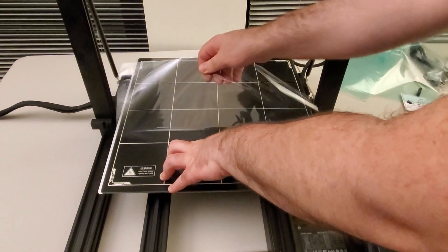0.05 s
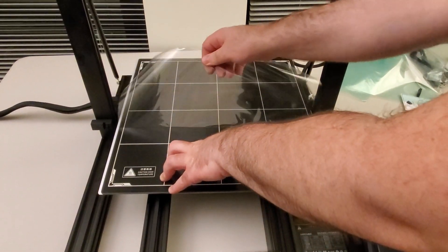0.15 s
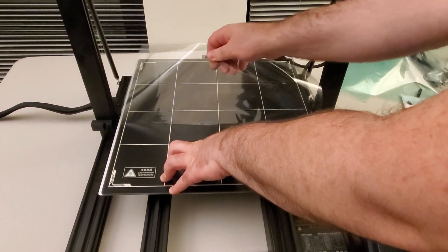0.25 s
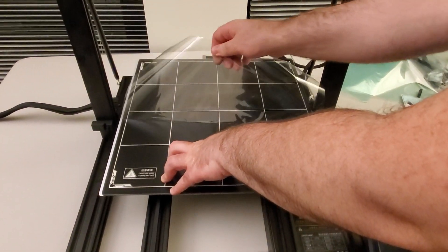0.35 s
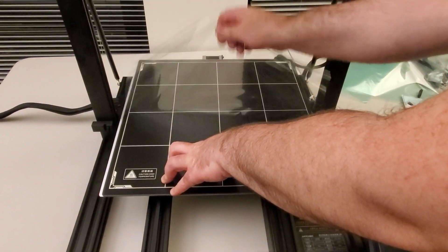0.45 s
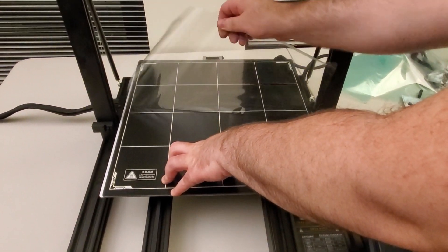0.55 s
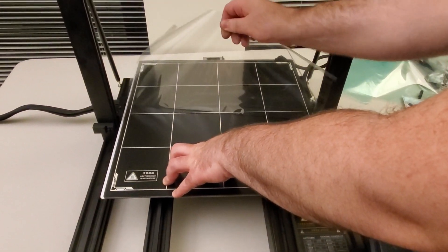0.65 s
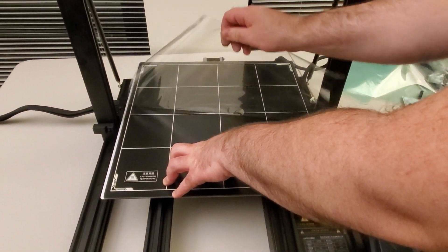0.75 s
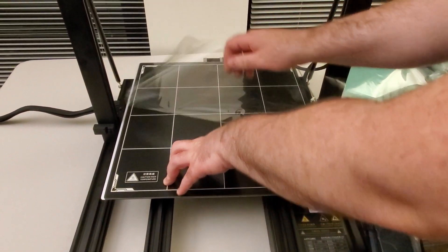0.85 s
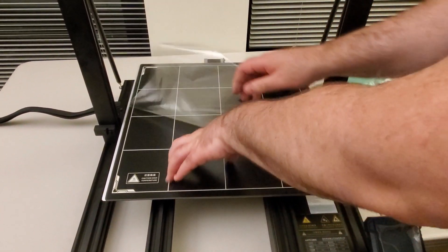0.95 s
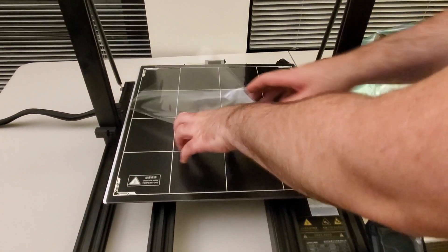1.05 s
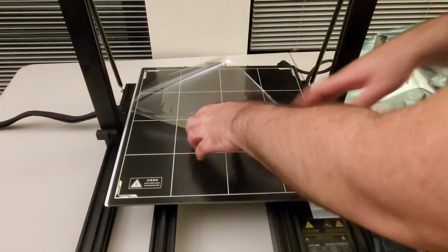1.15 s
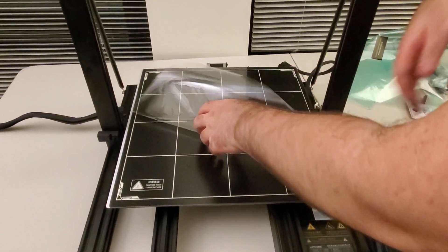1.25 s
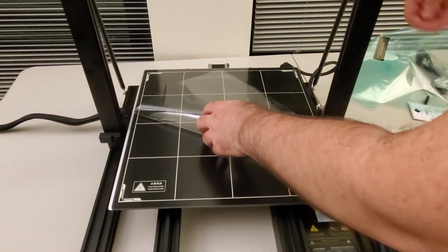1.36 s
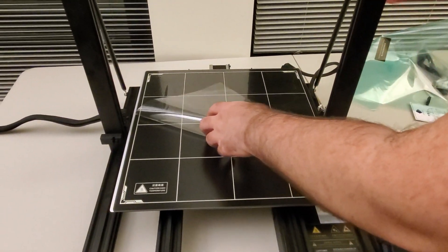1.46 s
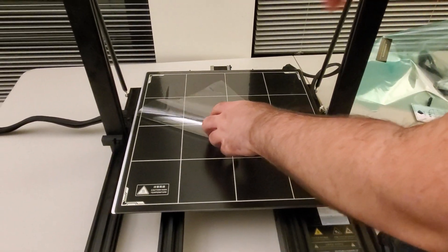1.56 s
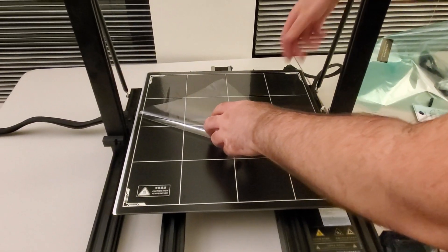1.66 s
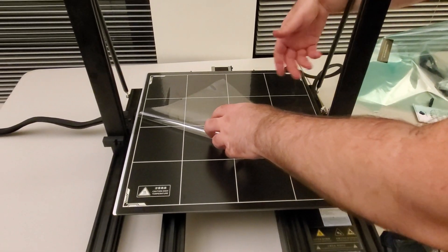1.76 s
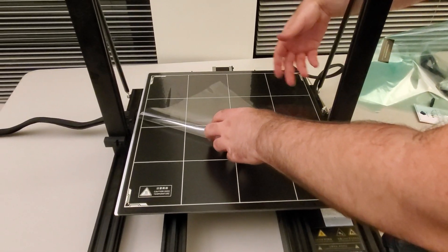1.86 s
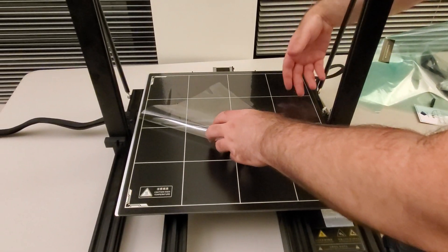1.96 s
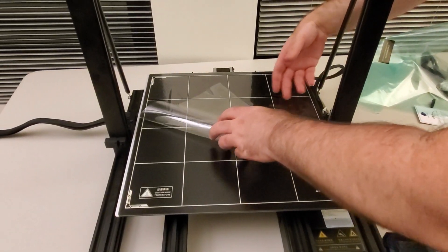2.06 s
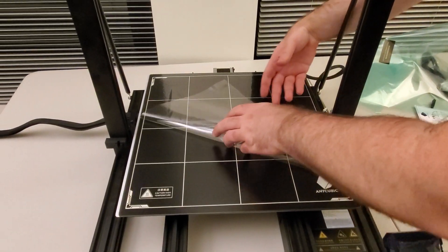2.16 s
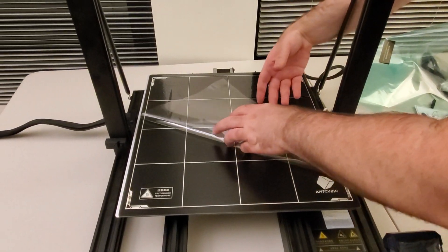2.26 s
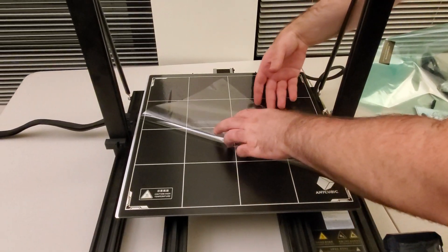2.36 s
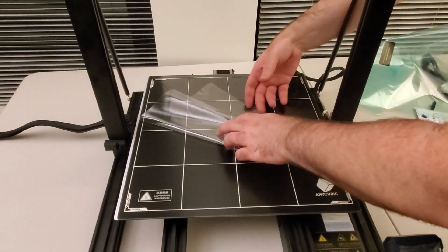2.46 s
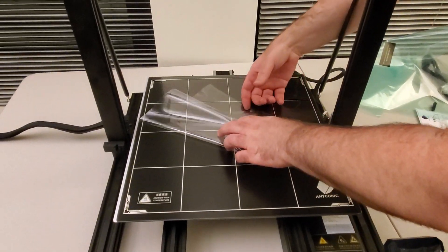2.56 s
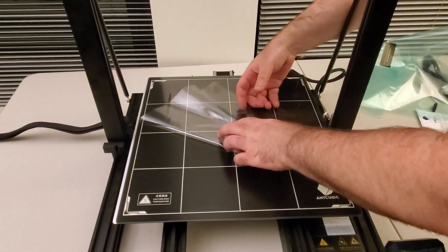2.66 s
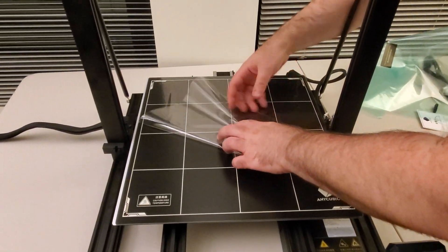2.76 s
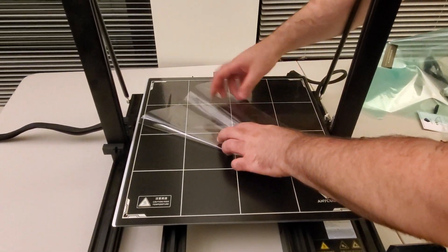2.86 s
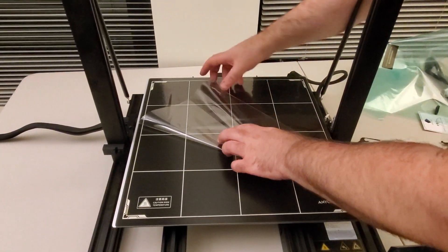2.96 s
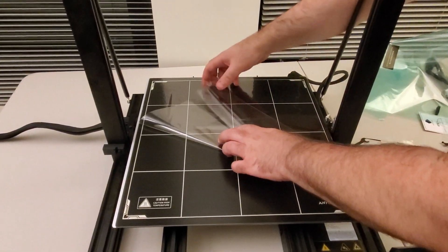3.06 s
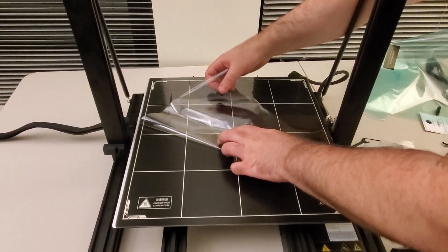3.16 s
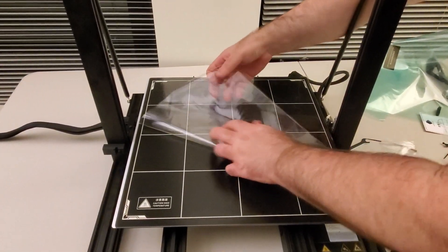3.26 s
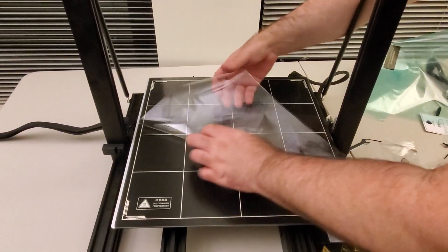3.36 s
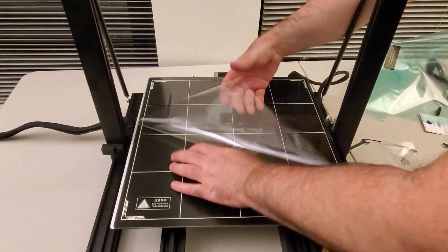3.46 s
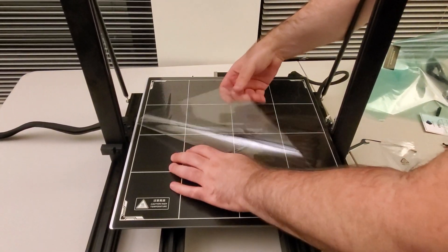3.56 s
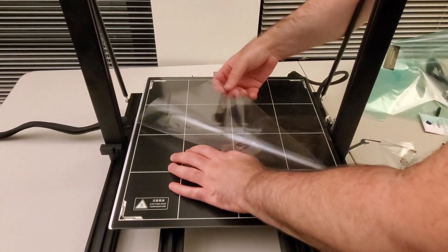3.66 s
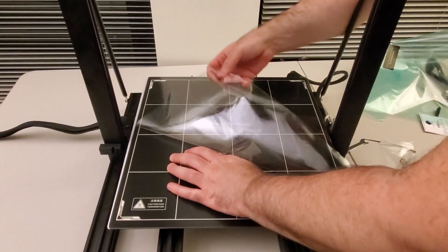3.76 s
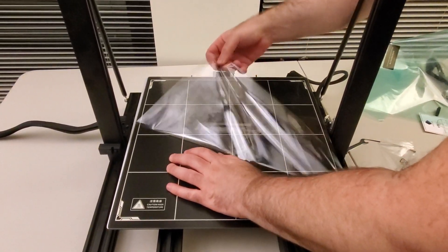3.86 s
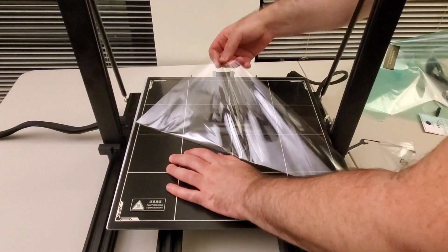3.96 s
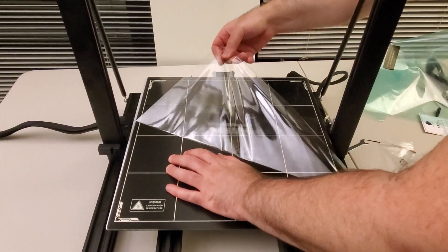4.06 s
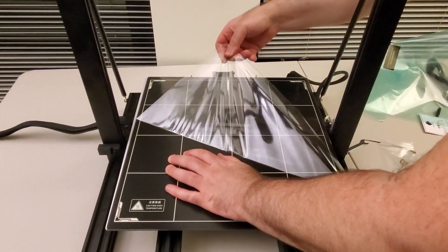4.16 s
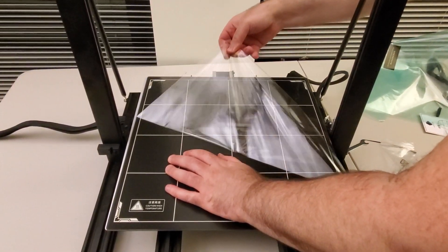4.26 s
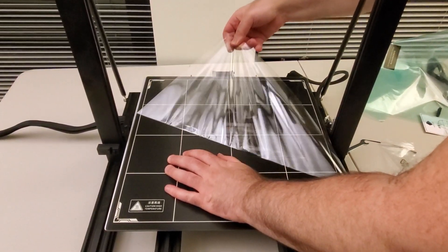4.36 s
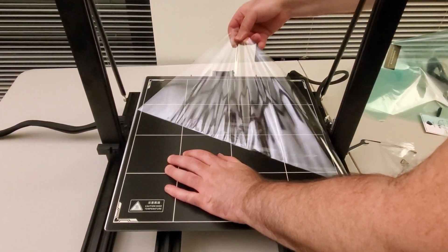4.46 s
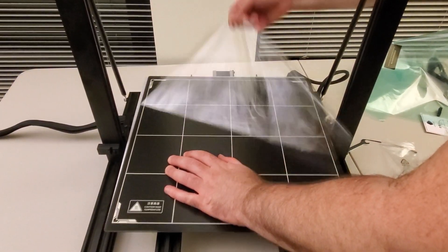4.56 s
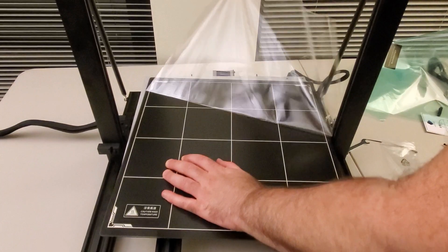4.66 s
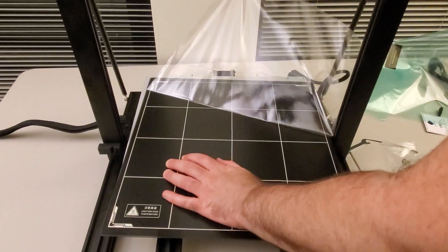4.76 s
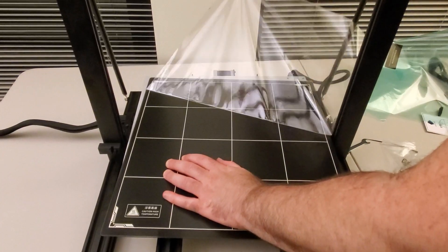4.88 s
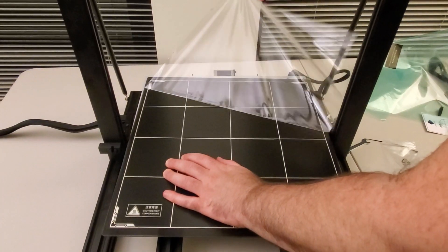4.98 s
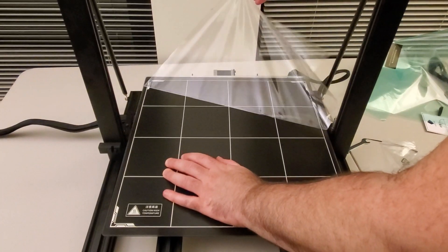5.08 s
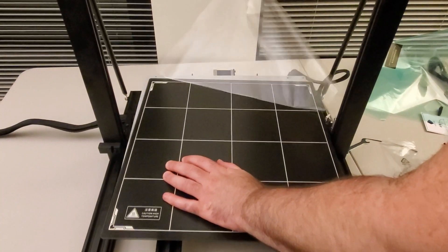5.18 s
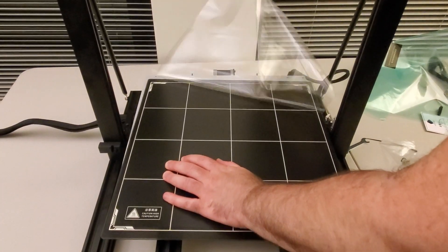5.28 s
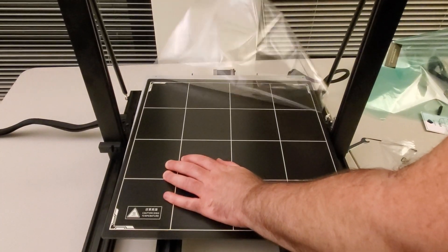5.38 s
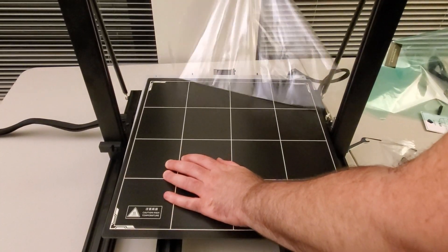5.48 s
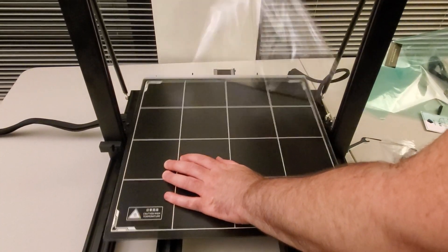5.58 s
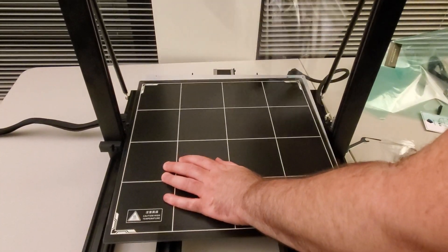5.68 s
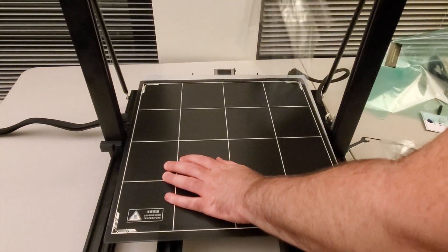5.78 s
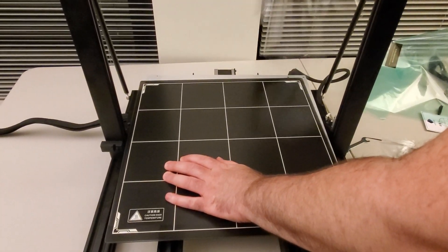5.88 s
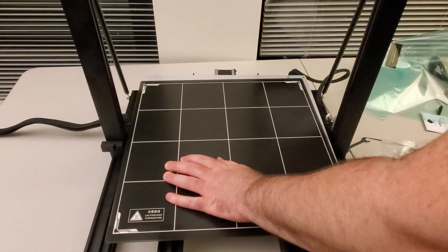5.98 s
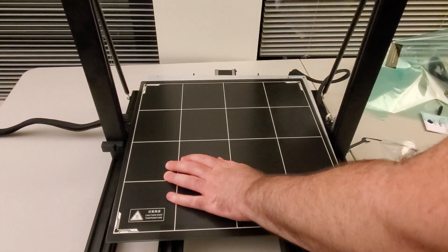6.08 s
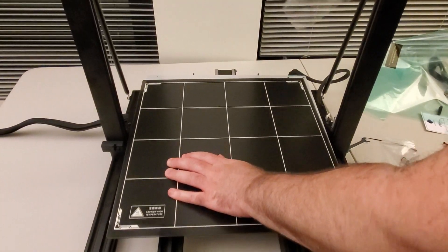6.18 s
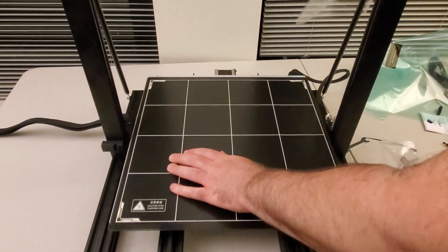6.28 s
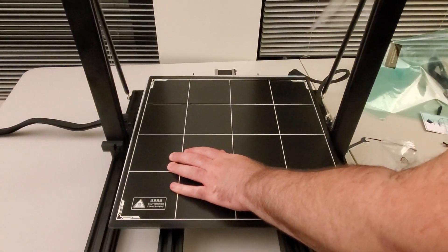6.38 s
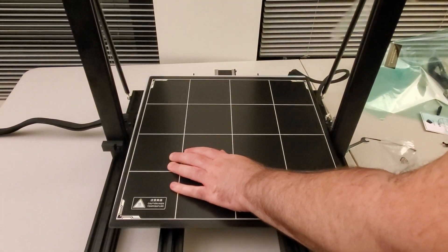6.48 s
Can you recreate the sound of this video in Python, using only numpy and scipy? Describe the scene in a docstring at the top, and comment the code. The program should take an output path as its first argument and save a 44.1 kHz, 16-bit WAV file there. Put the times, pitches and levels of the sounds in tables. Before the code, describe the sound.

Hands rub a plate and rip adhesive film loose; the sheet rustles and snaps, then pops free in bursts over a faint fan.

```python
"""A hand rubs dully on a flat plate, a thump and a short rip follow at once, over a faint fan.
Protective film is peeled by hand off the plate in a small live room, close to two microphones.
Glue lets go in rips (dense random slips) and single ticks (dispersed cracks); the loose sheet
rustles (clumped clicks through a resonance), snaps at its creases and thumps when it jerks.
Fingertips tap the plate (short noise bursts). The fan is coloured noise plus wavering tones."""
import sys
import numpy as np
from scipy import signal
from scipy.fft import rfft, irfft, next_fast_len
from scipy.io import wavfile
from scipy.ndimage import uniform_filter1d, minimum_filter1d

SR = 44100
rng = np.random.default_rng(int(sys.argv[2]) if len(sys.argv) > 2 else 0)


def bounce(signal):
    """Save signal as a 16-bit WAV file at the path given by the first command-line argument."""
    frames = np.transpose(np.atleast_2d(signal))
    limited = np.clip(frames, -1, 1)
    pcm = np.round(limited * 32767).astype(np.int16)
    wavfile.write(sys.argv[1], SR, pcm)


N = 288007
TIME = np.arange(N) / SR

# All levels are relative, ahead of the mix gains; colours are relative spectral densities.
# fan wash: [f/Hz, density/dB]
AIR_COLOUR = [(30, -15), (140, -12.5), (300, -4), (500, -3), (740, -20), (1200, -5.5), (2600, -9),
              (5000, -24), (8000, -33.5), (16000, -41.5)]
AIR_DB = -56
# fan tones: [f/Hz, level/dB]
FAN_TONES = [(145.3, -67), (398.4, -59), (513, -57.5)]
# swell and fade of the fan tones: [t/s, gain/dB]
HUM_SWELL = [(1.2, -11.5), (2.2, -2), (3.3, 3.5), (5, -13.5), (6.5, -8.5)]
# hand rubs and presses on the plate: [start t/s, length/s, level/dB]
RUBS = [(0, 0.23, -38), (0.206, 0.67, -50.5), (0.964, 0.39, -50.5), (2.28, 1.6, -48.5), (3.558, 0.26, -42),
        (3.885, 0.14, -44.5), (4.25, 0.23, -40.5), (5.692, 0.21, -46)]
# friction colour: [f/Hz, density/dB]
RUB_COLOUR = [(20, -35), (40, -6), (60, 1), (100, -10), (140, 2.5), (250, -8.5), (500, -2), (1000, -3),
              (1600, -3), (4000, -59)]
RUB_ATTACK_S, RUB_RISE_DB, RUB_RELEASE_S = 0.01, 4, 0.075
# sheet jerks and pushes on the plate: [t/s, level/dB, flap f/Hz, decay/s]
THUMPS = [(0.003, -36.5, 65.4, 0.037), (0.174, -24.5, 91.4, 0.015), (0.525, -15, 59, 0.0085),
          (3.564, -42, 63.3, 0.03)]
# plate ringing under a thump: [f/Hz, level re thump/dB, decay/s]
PLATE_MODES = [(181, -18, 0.018), (286.3, -21, 0.044)]
# runs of tiny glue slips: [t/s, length/s, level/dB, swell over the run/dB, plate share/dB]
RIPS = [(0.006, 0.027, -18, -9.5, -16), (0.174, 0.017, -14, -12, -10.5), (0.508, 0.048, -15.5, 2.5, -10.5),
        (3.923, 0.024, -21, 8, -20), (4.367, 0.011, -18, -7, -18), (4.6, 0.0071, -23.5, -14, -12),
        (4.638, 0.102, -18, 0, -19.5), (5.1954, 0.064, -15, -5, -14), (5.49, 0.047, -24.5, 1, -11.5),
        (5.6498, 0.08, -18, -7, -11.5), (5.962, 0.027, -23.5, -8, -15.5)]
# slips heard from the film: [f/Hz, density/dB]
RIP_COLOUR = [(35, -57), (60, -42), (281, -20.5), (458, -4.5), (715, -6.5), (924, -4.5), (1660, -3),
              (2970, 1), (5210, -7), (6900, -8), (7570, -14.5), (11300, -10), (16000, -13.5)]
# the plate's answer to the slips: [f/Hz, density/dB]
PLATE_COLOUR = [(30, -15), (90, -19), (160, -3), (260, -11), (430, -0.5), (800, 0), (1600, -23.5),
                (4000, -74.5)]
# single glue spots pop under the taut film: [t/s, level/dB]
TICKS = [(0.8708, -20), (3.9584, -2.5), (4.185, -9), (4.1939, -7.5), (4.2744, -12.5), (4.355, -8),
         (4.4022, -11), (4.438, -11.5), (4.4495, -3.5), (4.5046, -2.5), (4.5159, -8.5), (4.5491, -10.5),
         (4.568, -4.5), (4.5774, -6), (4.6266, -7), (5.1022, -23.5), (5.136, -21.5), (5.1574, -19.5),
         (6.1961, -18.5), (6.2477, -22.5)]
# hand moves the loose sheet, which rings higher when taut: [start t/s, length/s, level/dB, ring f/Hz]
FLEXES = [(0.88, 0.038, -26.5, 2600), (0.919, 0.072, -34.5, 2640), (0.999, 0.08, -29, 3340),
          (1.08, 0.11, -31, 2900), (1.196, .19, -36.5, 2690), (1.403, 0.076, -43.5, 2310),
          (1.611, 0.029, -44.5, 1370), (1.614, 0.016, -59, 3175), (2.292, 0.12, -41.5, 1630),
          (2.453, 0.1, -31, 1890), (2.612, 0.062, -31, 2480), (2.745, 0.15, -28.5, 2460),
          (2.892, 0.064, -35, 2250), (2.992, 0.04, -36, 2240), (3.167, 0.087, -30, 2220),
          (3.313, 0.052, -20.5, 2640), (3.397, .18, -26.5, 2240), (3.595, 0.18, -29, 2600),
          (3.63, .19, -27, 880), (3.815, 0.13, -31, 2780), (4.146, 0.17, -41.5, 3000),
          (4.286, 0.61, -37, 2320), (5.854, 0.092, -29.5, 2540), (6.277, 0.071, -42.5, 2490),
          (6.354, 0.2, -49.5, 2660)]
# rustle colour: [f/Hz, density/dB]
RUSTLE_COLOUR = [(120, -31), (200, -15), (500, -7.5), (750, -19), (1040, -1.5), (2610, -2.5), (3970, -2),
                 (7970, -18), (9400, -20.5), (16000, -31)]
FLEX_ATTACK_S, FLEX_RISE_DB, FLEX_RELEASE_S = 0.0037, 1, 0.0043
# treble gain per octave of ring pitch above the slack sheet's
TAUT_DB_PER_OCTAVE, SLACK_HZ = 2.5, 2370
# creases of the loose sheet buckle: [t/s, level/dB, treble re body/dB]
SNAPS = [(0.889, -13.5, -26), (1.018, -12.5, -29), (1.107, -11, -18), (1.1451, -14, -22),
         (1.3285, -16.5, -23), (2.2199, -24, -20), (2.3048, -28, -44), (2.4427, -13, -32),
         (2.5453, -11, -26), (2.6162, -8.5, -12), (2.8158, -11.5, -24), (2.8616, -7, -31),
         (2.7457, -11.5, -30), (3.1945, -7, -26), (3.2341, -7.5, -22), (3.3249, -5, -24),
         (3.4674, -8.5, -28), (3.6682, -8, -21), (3.6974, -8, -19), (3.7555, -7.5, -16),
         (3.8028, -5.5, -20), (3.8799, 7.5, -27), (3.9945, -10, -32), (6.4775, -20, -17), (6.5176, -16, -9)]
# colour of snaps, ticks and small creases: [f/Hz, density/dB]
SNAP_COLOUR = [(100, -18), (500, -30), (1000, -13), (1800, -5), (2900, -1), (4200, -3.5), (5500, -9),
               (8000, -9), (11000, -0.5), (16000, -1.5)]
# fingertips touch the plate: [t/s, level/dB]
TAPS = [(1.9207, -41.5), (2.173, -39), (2.199, -43), (2.2196, -34)]
# touch colour: [f/Hz, density/dB]
TAP_COLOUR = [(100, -3), (450, -11), (1150, 1), (2800, -4), (5000, -15), (15000, -34)]
# echoes off plate and table: [delay at left/s, relative gain]
ECHOES = [(.0011, 0.083), (.0029, 0.38)]
# room decay: [f/Hz, T60/s]
ROOM_T60 = [(100, 0.76), (500, 0.61), (1400, 0.61), (3700, 0.73), (9700, 0.57), (15000, 0.32)]
# likeness of the room sound at the two microphones: [f/Hz, correlation]
LIKENESS = [(100, 0.98), (250, 0.95), (600, 0.3), (1400, 0), (4000, 0)]
# microphone balance: [f/Hz, left minus right/dB]
LEAN = [(60, 1.5), (92, 0.5), (140, 4), (210, 1), (330, 3), (500, 3.5), (770, 7), (1170, 8.5), (1790, 11.5),
        (2740, 13), (4190, 10.5), (6410, 10.5), (9810, -3.5), (15000, 8)]
RIGHT_LATE_S = 0.00002  # extra travel time to the right microphone
EDGE_HZ = 16000  # upper band limit


def amp(db):
    """Decibels to gain."""
    return 10 ** (np.asarray(db) / 20)


def evened(x):
    """Scales to rms 1."""
    return x / np.sqrt(np.mean(x ** 2) + 1e-20)


def read(points, hz):
    """Reads a table on a log-frequency axis."""
    f, value = np.transpose(points)
    return np.interp(np.log(hz + 1), np.log(f + 1), value)


def add(mix, s, sound):
    """Mixes a sound in at time s."""
    part = mix[max(round(s * SR), 0):][:len(sound)]
    part += sound[:len(part)]


def coloured(x, colour, size=4096):
    """Causal minimum-phase filter of unit energy with the given spectrum."""
    log_gain = np.log(amp(read(colour, abs(np.fft.fftfreq(size, 1 / SR)))))
    spectrum = np.exp(np.conj(signal.hilbert(log_gain)))
    ring = np.fft.ifft(spectrum).real[:size // 2]
    return signal.oaconvolve(x, ring / np.linalg.norm(ring))[:N]


def brightened(x, treble_db, split_hz=6500):
    """Raises or lowers the treble above split_hz."""
    split_hz = min(split_hz, SR / 3)
    low = signal.butter(2, split_hz, "low", fs=SR, output="sos")
    high = signal.butter(2, split_hz, "high", fs=SR, output="sos")
    body = signal.sosfilt(np.vstack([low, low]), x)
    treble = signal.sosfilt(np.vstack([high, high]), x)
    return body + amp(treble_db) * treble


def wander(rate_hz):
    """Smooth random curve of rms 1, band-limited near rate_hz."""
    size = next_fast_len(N)
    hz = np.fft.rfftfreq(size, 1 / SR)
    spectrum = rfft(rng.standard_normal(size)) * np.exp(-(hz / rate_hz) ** 2)
    return evened(irfft(spectrum, size)[:N])


def crackle(per_s, spread_db):
    """Random clicks, mostly small, a few large; rms 1."""
    size = amp(spread_db * np.minimum(rng.exponential(1, N), 4))
    sign = rng.choice([-1, 1], N)
    return evened(size * sign * (rng.random(N) < per_s / SR))


def stroke(length, attack_s, rise_db, release_s):
    """Envelope of one hand move: attack, slowly rising hold, release."""
    age = TIME[TIME < length + 6 * release_s]
    hold = amp(rise_db * (np.minimum(age / length, 1) - 1))
    release = np.exp(-np.maximum(age - length, 0) / release_s)
    return np.minimum(age / attack_s, 1) * hold * release


def resonate(x, hz, width_hz):
    """Resonance of gain 1 following the curve hz: shift down, smooth, shift back."""
    turn = np.exp(2j * np.pi * np.cumsum(hz) / SR)
    r = np.exp(-np.pi * width_hz / SR)
    return 2 * (turn * signal.lfilter([1 - r], [1, -r], x / turn + 1e-18)).real


def pops(rows, crack_s, settle_s, settle_db, size=4096):
    """Each pop is one sharp dispersed crack with small crackles as the film settles."""
    t, hz, out = TIME[:size], np.fft.rfftfreq(size, 1 / SR), np.zeros(N)
    delay_s = crack_s / np.sqrt(1 + hz / 1000)  # bending waves carry the treble fastest
    crack = evened(irfft(np.exp(-2j * np.pi * np.cumsum(delay_s) * hz[1])))
    small = crackle(per_s=6000, spread_db=2.5)
    for s, db, treble_db in rows:
        settle = evened(np.roll(small, -round(s * SR))[:size] * np.exp(-t / settle_s))
        add(out, s, amp(db) * brightened(crack + amp(settle_db) * settle, treble_db))
    return coloured(out, SNAP_COLOUR)


def fan():
    """Steady wash of air: coloured noise."""
    return amp(AIR_DB) * coloured(rng.standard_normal(N), AIR_COLOUR)


def hum(waver_hz=2.5, flutter_db=2):
    """Faint fan tones, wavering in pitch and level."""
    tones = np.zeros(N)
    for hz, db in FAN_TONES:
        phase = 2 * np.pi * np.cumsum(hz + waver_hz * wander(23)) / SR
        tones += amp(db + flutter_db * wander(13)) * evened(np.sin(phase))
    return tones * amp(np.interp(TIME, *np.transpose(HUM_SWELL)))


def rub(uneven_db=2, resting_db=-60):
    """Dull, uneven friction of hand and sheet on the plate, over a faint constant floor."""
    force = np.full(N, amp(resting_db))
    for s, length, db in RUBS:
        add(force, s, amp(db) * stroke(length, RUB_ATTACK_S, RUB_RISE_DB, RUB_RELEASE_S))
    uneven = amp(uneven_db * wander(38))
    return coloured(rng.standard_normal(N) * force * uneven, RUB_COLOUR)


def thumps(flap_lag_s=0.012):
    """The plate rings briefly; the sheet's low flap follows, swells and dies."""
    t, out = TIME[:SR // 2], np.zeros(N)

    def swing(hz, decay_s):
        """Sine under an envelope that peaks at decay_s."""
        return t / decay_s * np.exp(1 - t / decay_s) * np.sin(2 * np.pi * hz * t)

    for s, db, hz, decay_s in THUMPS:
        for mode_hz, mode_db, mode_s in PLATE_MODES:
            add(out, s, amp(db + mode_db) * swing(mode_hz, mode_s))
        add(out, s + flap_lag_s, amp(db) * swing(hz, decay_s))
    return signal.sosfilt(signal.butter(3, 45, "high", fs=SR, output="sos"), out)


def rips(release_s=0.004, treble_db=0.0, snag_db=2.0, bite_db=-8, bite_s=0.0094):
    """The peel front jerks loose, races on in dense slips that also shake the plate, then stops."""
    slips = evened(crackle(per_s=6000, spread_db=4.0) * amp(snag_db * wander(150)))
    film, plate = np.zeros((2, N))
    for s, length, db, swell_db, plate_db in RIPS:
        t = TIME[TIME < length + 6 * release_s]
        swell = amp(db + swell_db * (np.minimum(t / length, 1) - 0.5))
        force = swell * np.exp(-np.maximum(t - length, 0) / release_s)
        jerk = amp(bite_db) * np.exp(-t / bite_s) * rng.standard_normal(len(t))
        run = force * (jerk + evened(np.roll(slips, -round(s * SR))[:len(t)]))
        add(film, s, run)
        add(plate, s, amp(plate_db) * run)
    return coloured(brightened(film, treble_db), RIP_COLOUR) + coloured(plate, PLATE_COLOUR)


def glue_ticks(treble_db=-6):
    """Glue spots all pop with the same short crack."""
    rows = [(s, db, treble_db) for s, db in TICKS]
    return pops(rows, crack_s=0.0012, settle_s=0.0027, settle_db=-2)


def rustle(clump_db=2.5, surge_db=1, ring_db=13.5, ring_q=3.8, drift_octaves=0.23,
           crease_db=-1.0, crease_treble_db=-20):
    """Clumps of tiny buckles ring in the stretched sheet; small creases click at random."""
    clumps = amp(clump_db * wander(115) + surge_db * wander(25))
    buckles = evened(crackle(per_s=2400, spread_db=3.0) * clumps)
    drift = 2 ** (drift_octaves * wander(47))
    sheet, effort = np.zeros((2, N))
    for s, length, db, ring_hz in FLEXES:
        force = amp(db) * stroke(length, FLEX_ATTACK_S, FLEX_RISE_DB, FLEX_RELEASE_S)
        now = (round(s * SR) + np.arange(len(force))) % N
        grains = force * buckles[now]
        ring = resonate(grains, ring_hz * drift[now], width_hz=ring_hz / ring_q)
        taut_db = TAUT_DB_PER_OCTAVE * np.log2(ring_hz / SLACK_HZ)
        add(sheet, s, brightened(grains + amp(ring_db) * ring, taut_db, split_hz=3960))
        add(effort, s, force)
    creases = brightened(crackle(per_s=75, spread_db=2) * effort, crease_treble_db)
    return coloured(sheet, RUSTLE_COLOUR) + amp(crease_db) * coloured(creases, SNAP_COLOUR)


def crease_snaps():
    """Creases buckle with a longer crack and louder settling than the glue ticks."""
    return pops(SNAPS, crack_s=0.002668, settle_s=0.0075, settle_db=5)


def taps(decay_s=0.005):
    """A fingertip lands with a short, dull tick: decaying noise."""
    force = sum(amp(db) * (TIME >= s) * np.exp(-abs(TIME - s) / decay_s) for s, db in TAPS)
    return coloured(force * rng.standard_normal(N), TAP_COLOUR)


def near(x, echo_db):
    """Direct sound and first echoes; the echoes reach the right microphone a little later."""
    out = np.array([x, x])
    for delay_s, gain in ECHOES:
        echo = amp(echo_db) * gain * x
        add(out[0], delay_s, echo)
        add(out[1], delay_s + 0.00031, echo)
    return out


def diffuse(x, early_db=1, early_t60=0.12, size=256):
    """The room stores energy band by band and gives it back as a dying noise wash."""
    frames = dict(nperseg=size, noverlap=size * 3 // 4)
    hz, t, z = signal.stft(x, SR, **frames)
    age = t[t < 1]
    late = amp(-60 * age / read(ROOM_T60, hz)[:, None]) ** 2
    fading = late + amp(early_db - 60 * age / early_t60) ** 2
    fading[:, :2] = 0  # the nearest wall is a few milliseconds away
    fading /= fading.sum(1).mean()
    power = signal.fftconvolve(abs(z) ** 2, fading, axes=1)[:, :len(t)]
    noise = signal.stft(rng.standard_normal((2, N)), SR, **frames)[2]
    same = np.clip(read(LIKENESS, hz), 0, 1)[:, None]
    noise[1] = same * noise[0] + np.sqrt(1 - same ** 2) * noise[1]
    wash = noise / noise.std() * np.sqrt(abs(power))
    return signal.istft(wash, SR, **frames)[1][:, :N]


def scene():
    """Mixes sources and room; the left microphone faces the film, the right is shaded."""
    peel = rips()
    handling = amp(-11) * rustle() + amp(-2.5) * rub()
    snaps = amp(-23) * crease_snaps() + amp(4) * taps()
    ticks = amp(-25.5) * glue_ticks()
    mix = near(peel + handling, echo_db=-22) + near(snaps, echo_db=-14) + near(ticks, echo_db=4.5)
    mix += diffuse(peel + amp(-2.5) * handling + amp(-4) * snaps + amp(1) * ticks + fan())
    mix += hum() + amp(-1) * thumps()
    hz = np.fft.rfftfreq(N, 1 / SR)
    lean = amp(read(LEAN, hz))
    late = np.exp(-2j * np.pi * hz * RIGHT_LATE_S)
    balance = np.array([lean, late]) * np.sqrt(2 / (1 + lean ** 2))  # keeps the summed power
    return irfft(rfft(mix) * balance, N)


def record(dry, limit_db=-2, recover_db_per_s=500):
    """A quick limiter holds the peaks; then the low cut and the band limit."""
    peak_db = 20 * np.log10(-minimum_filter1d(-abs(dry).max(0), size=45) + 1e-9)
    fall_db = TIME * recover_db_per_s
    held_peak_db = np.maximum.accumulate(peak_db + fall_db) - fall_db
    over_db = np.maximum(held_peak_db - limit_db, 0)
    held = dry / amp(uniform_filter1d(over_db, size=45))
    held = signal.sosfilt(signal.butter(2, 38, "high", fs=SR, output="sos"), held)
    band = signal.firwin(401, EDGE_HZ, window=("kaiser", 8), fs=SR)
    return signal.oaconvolve(held, band[None], "same")


dry = scene()
out = record(dry)
bounce(out)
```